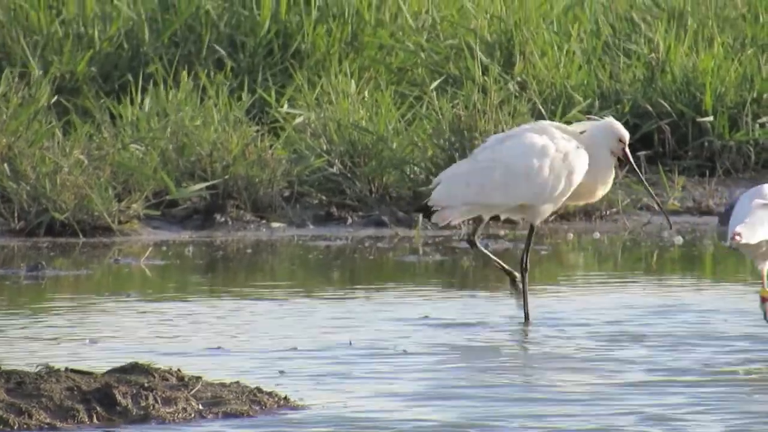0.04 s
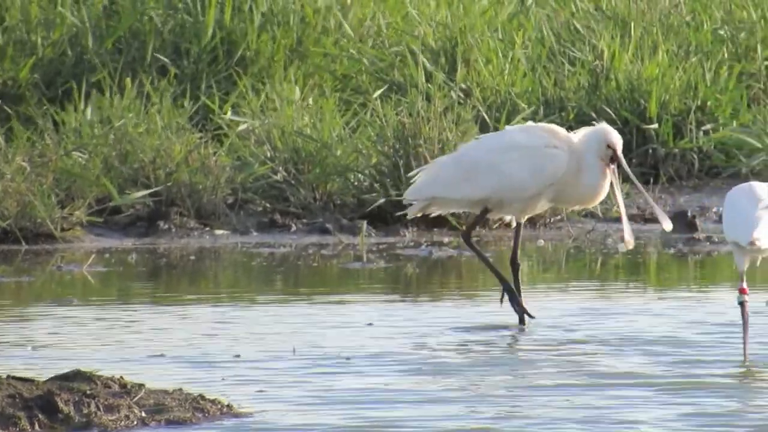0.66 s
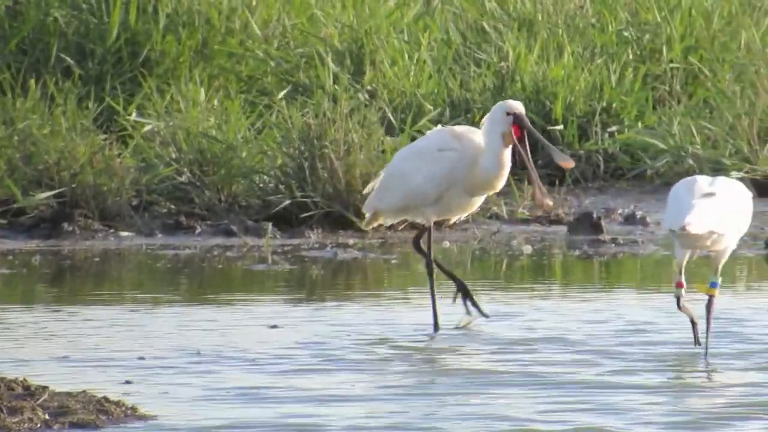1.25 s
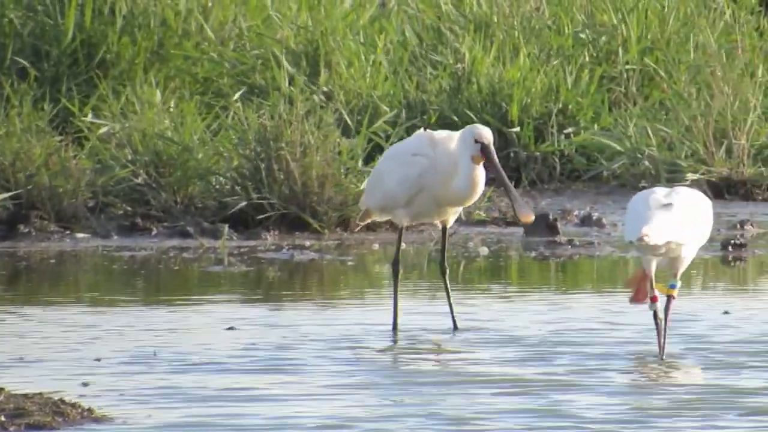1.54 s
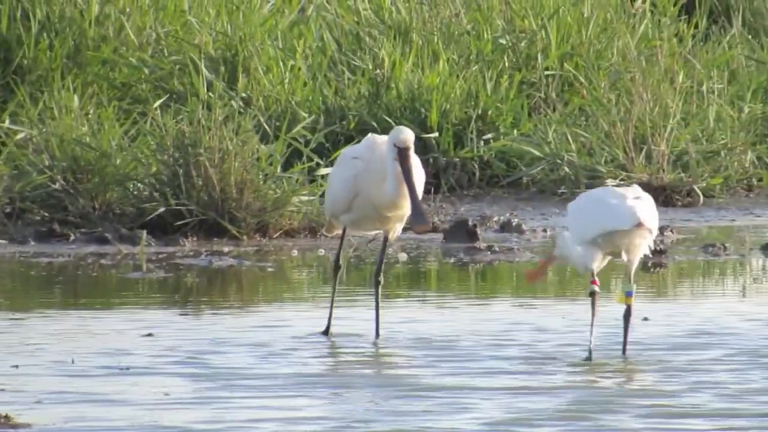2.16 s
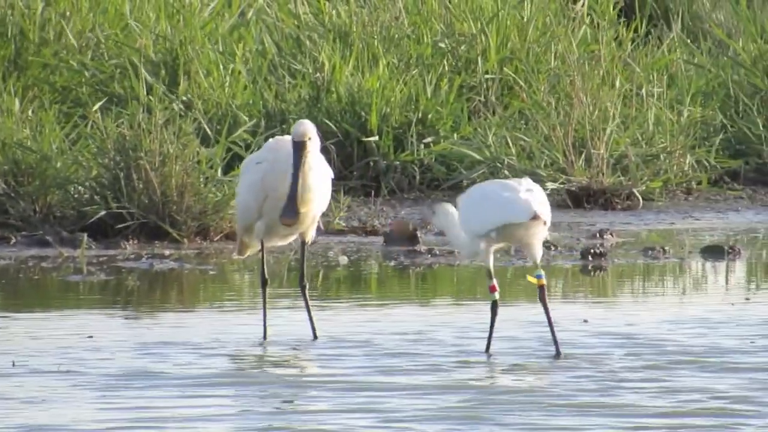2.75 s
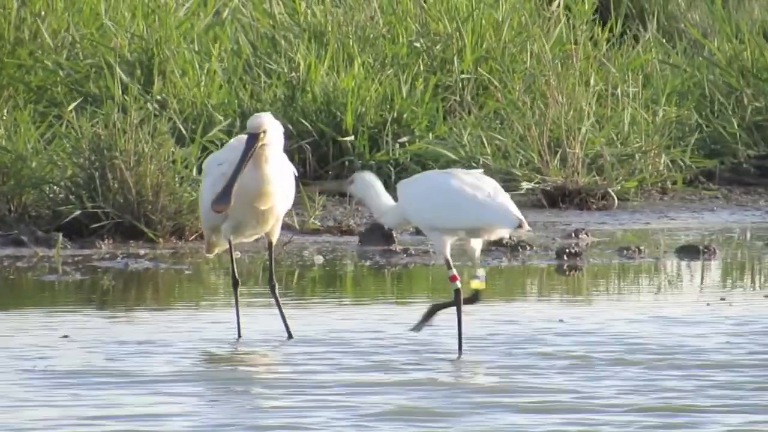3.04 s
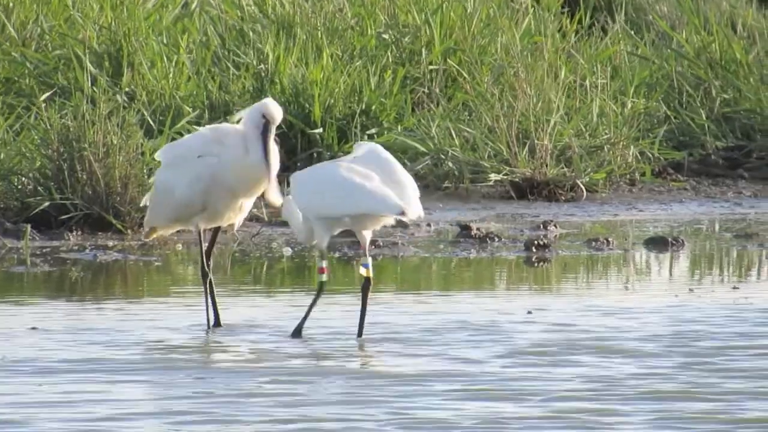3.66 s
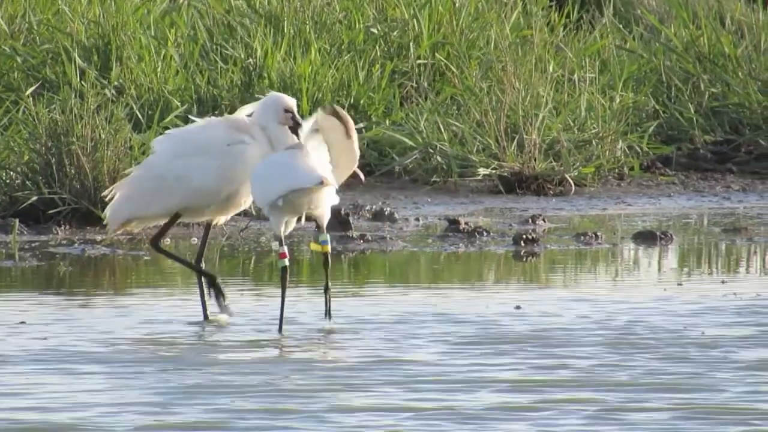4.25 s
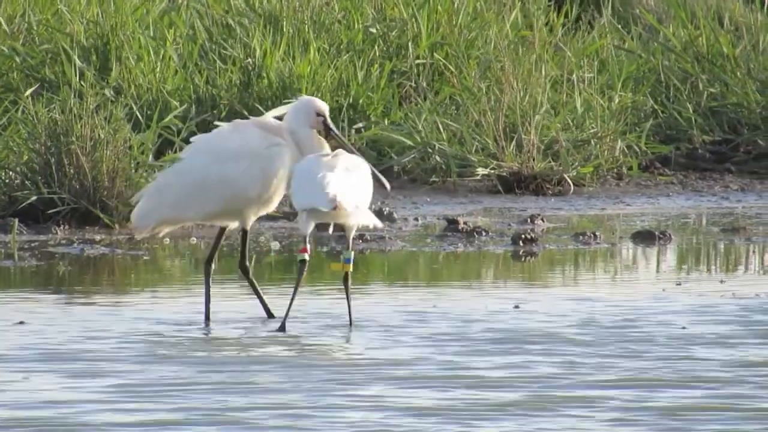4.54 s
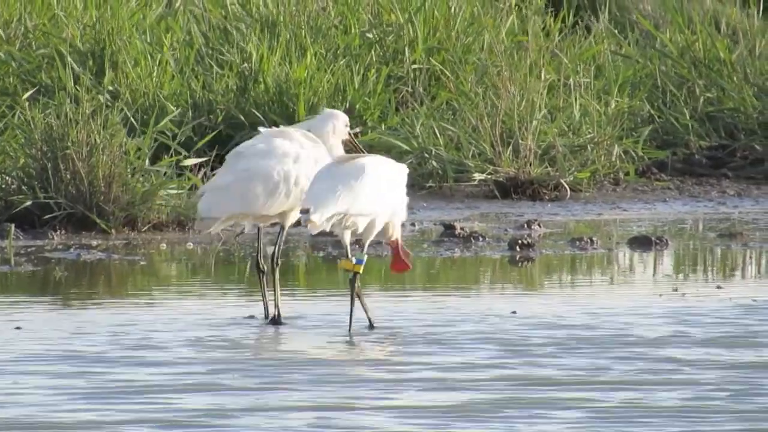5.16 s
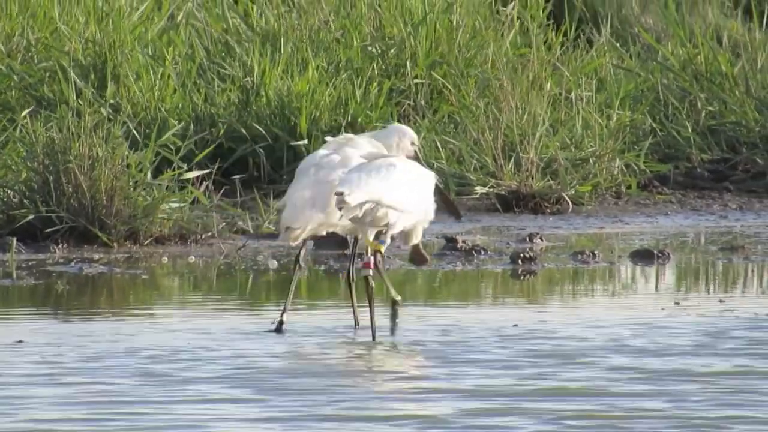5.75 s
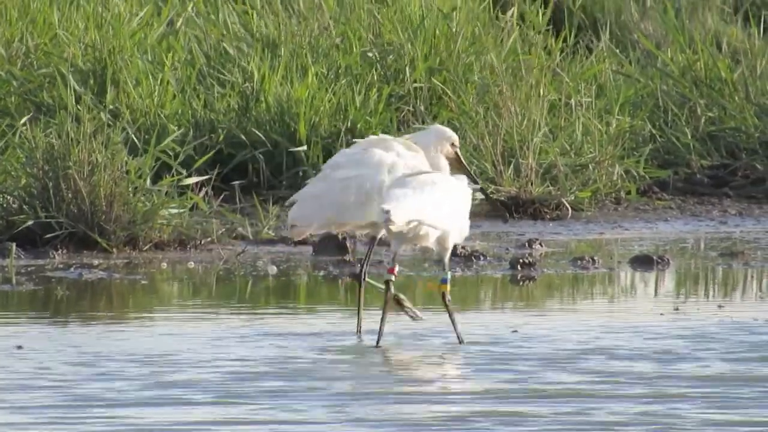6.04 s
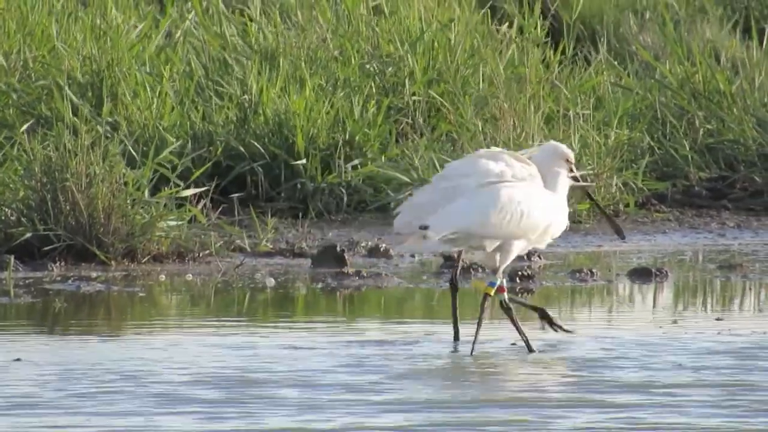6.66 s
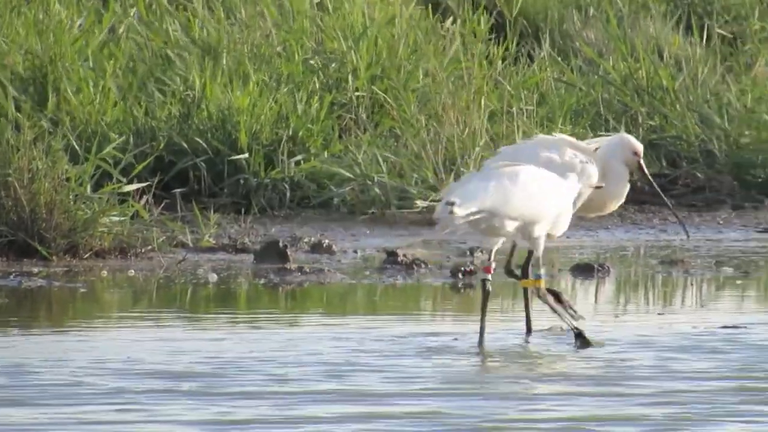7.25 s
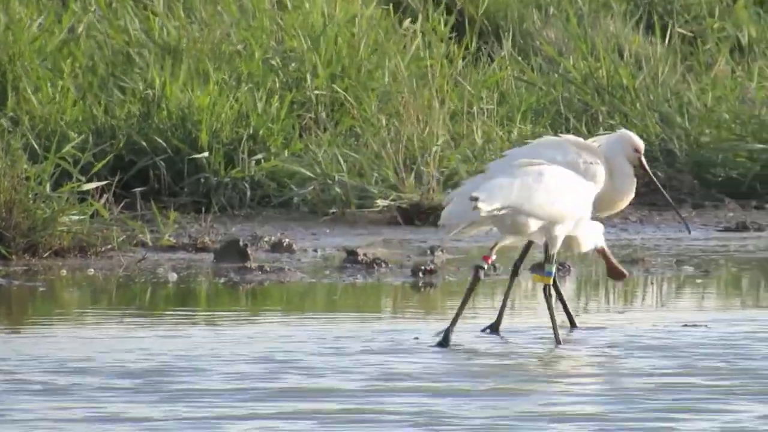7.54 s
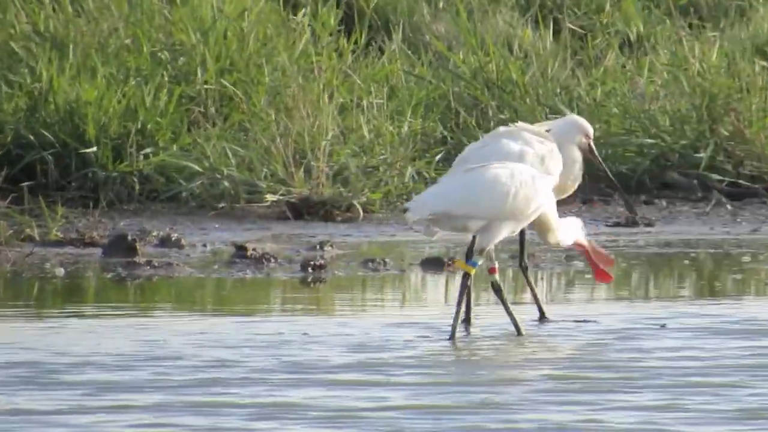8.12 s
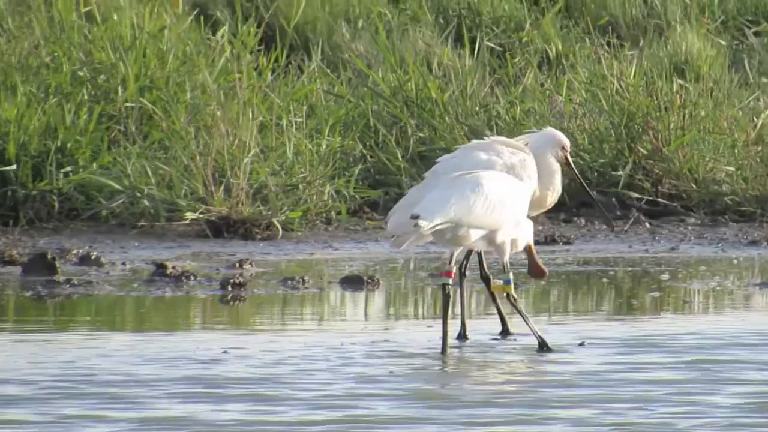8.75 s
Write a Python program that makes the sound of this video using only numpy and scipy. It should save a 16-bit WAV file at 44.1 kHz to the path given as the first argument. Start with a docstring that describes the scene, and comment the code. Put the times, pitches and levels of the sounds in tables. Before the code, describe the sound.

At a marsh pool, a songbird warbles, chatters and trills without pause above a distant rumble and soft wash of air.

```python
"""A distant rumble, the wash of open air and microphone hiss lie under the whole scene at a marsh pool.
At once a skylark starts to warble; its voice organ, the syrinx, slides, shakes or chops one pure whistle.
A low hum comes and goes from 2 s, while the lark chatters and rattles. Around 4 s it repeats high,
hissy pips and a buzz, and far-off water birds hoot faintly. Two cascades follow, then from about 7 s
three falling phrases with more far hoots. The song ends on quick flicks and a shivering trill."""
import sys
import numpy as np
from scipy import signal
from scipy.fft import rfft, irfft
from scipy.io import wavfile
from scipy.ndimage import map_coordinates

SR = 44100
rng = np.random.default_rng(int(sys.argv[2]) if len(sys.argv) > 2 else 0)


def materialize(psi):
    """Save the field psi as 16-bit PCM at rate SR to the path in sys.argv[1].

    A 1-D psi becomes a single channel; in a 2-D psi each row is a channel.
    """
    bounded = np.clip(np.atleast_2d(psi).T, -1, 1)
    quanta = np.round(bounded * 32767).astype(np.int16)
    wavfile.write(sys.argv[1], SR, quanta)


N = 387638
FREQS = np.maximum(np.arange(N // 2 + 1) * SR / N, 1)

# The tone colours of the three background noises. Each row: frequency in Hz, relative strength in dB.
RUMBLE_COLOUR = [(2.9, -32.5), (5.0, 6), (17, -3), (27, -7), (119, -18.5), (260, -29), (625, -46),
                 (902, -47.5), (1070, -47.5), (1180, -50), (1700, -61.5), (2400, -110)]
WASH_COLOUR = [(20, 2.5), (55, -14), (160, -25.5), (700, -27.5), (1500, -34.5), (2500, -55.5)]
HISS_COLOUR = [(900, -10.5), (1800, 1.5), (4500, -1.5), (15500, -3.5)]
# Calls of far-off birds. Each row: start and length in seconds, pitch at the start, middle and end
# in Hz, level in dB.
FAR_CALLS = [(.25, .35, 4780, 4830, 4980, -77), (3.877, .235, 1020, 1066, 1075, -60.5),
             (3.99, .11, 625, 682, 610, -62), (4.27, .1, 1020, 1060, 1120, -65),
             (7.55, .19, 1040, 1100, 1060, -65), (7.92, .2, 1055, 1092, 1010, -62)]
# The lark's song. A motif is a short phrase: all the slurs, pips and trills that bear its name.
# Each row: motif, start in seconds, level change in dB.
SONG = [("warble", -.099, 2), ("scoop", .229, 0), ("warble", .639, -.5), ("scoop", .962, -.5),
        ("warble", 1.371, 0), ("chatter", 1.706, 0), ("rattle", 2.414, 0), ("drone", 3.081, 0),
        ("drops", 3.494, -2), ("buzz", 3.624, 0), ("drops", 3.997, 1), ("buzz", 4.116, 1.5),
        ("drops", 4.489, 0), ("buzz", 4.620, -2), ("cascade", 4.999, 0), ("low whistle", 5.427, -1.5),
        ("twitter", 5.634, 0), ("cascade", 6.12, 0), ("low whistle", 6.569, 1), ("jumble", 6.784, 0),
        ("descent", 7.289, 0), ("descent", 7.589, 0), ("descent", 7.905, 1.6), ("flicks", 8.217, -.5),
        ("flicks", 8.387, 0), ("shiver", 8.561, 0)]
# Slurs are sliding notes. Each row: motif, course ("arc" or "snap"), start in the motif and length
# in seconds, pitch at the start, middle and end in Hz, base level in dB.
SLURS = [("scoop", "arc", .154, .16, 3400, 4070, 3680, -63),
         ("chatter", "arc", .028, .027, 2550, 2300, 2150, -62),
         ("chatter", "arc", .264, .026, 4700, 4560, 4280, -59),
         ("chatter", "arc", .293, .031, 3900, 3550, 3250, -58.5),
         ("rattle", "arc", .115, .011, 3400, 3050, 2300, -58),
         ("rattle", "arc", .133, .008, 2400, 2800, 3200, -61),
         ("cascade", "snap", .038, .038, 2900, 3950, 4050, -68),
         ("cascade", "snap", .174, .011, 5500, 3100, 2800, -66),
         ("low whistle", "snap", -.002, .03, 5500, 3950, 3750, -67),
         ("low whistle", "arc", .036, .008, 2560, 2780, 2650, -62.5),
         ("low whistle", "snap", .054, .076, 2550, 2330, 2270, -62),
         ("low whistle", "arc", .124, .028, 2320, 2170, 1980, -61),
         ("twitter", "arc", 0, .008, 5100, 3700, 2700, -62),
         ("twitter", "snap", .008, .014, 2700, 4700, 4900, -60.5),
         ("twitter", "arc", .025, .008, 5200, 4300, 2700, -62),
         ("twitter", "snap", .035, .027, 2700, 4750, 4100, -62.5),
         ("twitter", "arc", .059, .007, 4250, 3500, 2500, -62),
         ("twitter", "snap", .069, .031, 2300, 3550, 1800, -60.5),
         ("jumble", "arc", .102, .027, 6300, 5750, 3300, -63.5)]
# Runs of tiny notes. Each row: motif, start in the motif in seconds, number of pips, pips per second,
# pip length in seconds, first, middle and last pitch in Hz, base slide of a pip in Hz, base level in dB.
PIP_RUNS = [("scoop", .001, 11, 70.5, .012, 3460, 3130, 3360, 170, -61.3),
            ("chatter", 0, 2, 71, .01, 2200, 2300, 2400, -400, -63.5),
            ("chatter", .097, 6, 76, .009, 3600, 2830, 2520, 150, -57.5),
            ("chatter", .205, 3, 64, .009, 4620, 4620, 4680, 700, -52.5),
            ("chatter", .414, 10, 46.8, .009, 3900, 3980, 3950, 95, -62.5),
            ("chatter", .425, 9, 46.3, .009, 3020, 3020, 3000, 350, -63.5),
            ("rattle", .159, 5, 73, .011, 3300, 2680, 1900, -750, -59),
            ("rattle", .277, 37, 123.5, .0075, 2620, 2720, 2720, -1250, -61.8),
            ("drops", 0, 4, 36.5, .0098, 5780, 5060, 4350, -250, -54),
            ("buzz", .219, 5, 71, .0085, 5000, 4920, 4380, -200, -58.5),
            ("cascade", .001, 5, 122, .007, 3100, 2280, 2400, 200, -69),
            ("cascade", .076, 3, 55.5, .0175, 3620, 3450, 3300, 750, -62.5),
            ("jumble", 0, 3, 53, .01, 3300, 3500, 3750, -1100, -62),
            ("jumble", .056, 2, 52, .009, 4550, 4900, 5300, 200, -61),
            ("jumble", .164, 3, 38, .009, 4500, 4450, 4350, 500, -62),
            ("jumble", .174, 4, 38.5, .008, 3800, 3650, 2900, -1000, -60.5),
            ("jumble", .242, 7, 37.5, .008, 3000, 3080, 3100, 200, -69),
            ("jumble", .279, 6, 37.5, .008, 2560, 2520, 2520, -450, -63.5),
            ("descent", .144, 5, 53.5, .0185, 3700, 3290, 3130, -170, -59.5),
            ("flicks", 0, 4, 95, .009, 4200, 3400, 2450, 1300, -64.5),
            ("flicks", .054, 4, 48, .0085, 2950, 2650, 1950, 750, -58.3)]
# Trills are shaken notes. Each row: motif, course ("steady", "swells", "opens" or "settles"), start in
# the motif and length in seconds, pitch at the start, middle and end in Hz, base level at those three
# points in dB, shakes per second at first, pitch swing in Hz, dip in each shake in dB, and how far
# loudness runs ahead of pitch in radians.
TRILLS = [("warble", "swells", -.001, .252, 4700, 4400, 4400, -48, -52.5, -55.5, 49.6, 620, 8, .5),
          ("chatter", "settles", .356, .061, 3850, 3570, 3500, -59, -59.5, -60, 230, 400, 10, 1.2),
          ("rattle", "settles", .001, .082, 4450, 4170, 3920, -55.5, -58.5, -62, 117, 260, 10, 1.2),
          ("drone", "steady", -.001, .324, 4260, 4440, 4490, -53.5, -55.5, -51, 254, 100, 11, .26),
          ("buzz", "swells", .006, .227, 4190, 4740, 4970, -58, -55, -57.5, 262, 50, 8.5, .26),
          ("cascade", "opens", .198, .168, 4700, 3670, 2800, -62, -59.5, -54, 137, 400, 14, 1.1),
          ("twitter", "settles", .149, .245, 4600, 4300, 4000, -62, -65, -68, 69, 230, 10, 1.2),
          ("descent", "swells", 0, .152, 4850, 4630, 3830, -61, -60.5, -65, 55, -75, 16, -.1),
          ("shiver", "opens", 0, .255, 4330, 4170, 4350, -65, -58, -58.5, 75.1, 600, 7, .3)]
# How the microphone's two openings (ports) hear the lark. Each row: frequency in Hz, left minus right
# level in dB, how far the left runs ahead in radians.
PORT_DIFFERENCES = [(2260, 12, 0.22), (2730, 2, -0.23), (3390, 6.5, -0.99), (3600, -3, -0.95),
                    (3970, -12, .1), (4270, -6, 1), (5000, -3.5, 0.99)]


def undb(db):
    """Turn decibels into a number to multiply by."""
    return 10 ** (np.asarray(db) / 20)


def arc(u, start, middle, end):
    """A smooth curve through three values as u goes from 0 to 1."""
    return start + (end - start) * u + (2 * middle - start - end) * 2 * u * (1 - u)


def gate(t, length, attack, release):
    """A gentle fade in from time 0 and a fade out that ends at length."""
    return np.sin(np.pi / 2 * np.clip(np.minimum(t / attack, (length - t) / release), 0, 1)) ** 2


def wander(n, rate):
    """A smooth random curve, about 1 in size, that finds a new value rate times a second."""
    steps = np.arange(n) * rate / SR
    return map_coordinates(rng.standard_normal(int(steps[-1]) + 2), [steps], order=2, mode="nearest")


def add(track, start, sound):
    """Mix a sound into a track from a start time on."""
    at = int(start * SR) + np.arange(len(sound))
    inside = (at >= 0) & (at < len(track))
    track[at[inside]] += sound[inside]


def spread(table, column=1):
    """Spread one column of a table over all frequencies."""
    table = np.array(table, float)
    return np.interp(np.log(FREQS), np.log(table[:, 0]), table[:, column])


def noise(colour, db):
    """Noise of a given tone colour and level."""
    x = irfft(rfft(rng.standard_normal(N)) * undb(spread(colour)), N)
    return x * undb(db) / x.std()


def scatter(x, decay_s):
    """A blur of echoes from ground, reeds and banks, different at each port; it dies 60 dB in decay_s."""
    t = np.arange(SR) / SR
    tail = rng.standard_normal((2, SR)) * np.exp(-np.log(1000) * t / decay_s)
    tail /= np.sqrt(np.sum(tail[0] ** 2))
    return signal.fftconvolve(x[None], tail, axes=1)[:, :N]


def background(swell_db=.6):
    """The rumble reaches both ports alike, the wash of air differs between them, and each hisses alone."""
    rumble = noise(RUMBLE_COLOUR, db=-38.5) * undb(swell_db * wander(N, 2.89))
    wash = noise(WASH_COLOUR, db=-57.5) * np.array([[1], [-1]])
    hiss = np.array([noise(HISS_COLOUR, db=-68.5) for _ in range(2)])
    return rumble + wash + hiss


def hum(start_s=2.0, length=.8, hz=109, db=-51):
    """A low hum rises out of the rumble for a moment."""
    t = np.arange(N) / SR
    tone = np.sin(2 * np.pi * hz * t + wander(N, 10) / 2)
    return undb(db) * gate(t - start_s, length, length / 4, length / 2) * tone


def far_birds(direct_db=-1, echo_db=-6, waver=.007, fade_s=.04):
    """Soft hoots and pipings from across the marsh, blurred by distance."""
    calls = np.zeros(N)
    for start, length, *pitch_hz, db in FAR_CALLS:
        t = np.arange(int(length * SR)) / SR
        hz = arc(t / length, *pitch_hz) * (1 + waver * wander(len(t), 150))
        tone = np.sin(2 * np.pi * np.cumsum(hz) / SR)
        add(calls, start, undb(db) * gate(t, length, fade_s, fade_s) * tone)
    return undb(direct_db) * calls + undb(echo_db) * scatter(calls, decay_s=.3)


def whistle(hz, db, attack_s=.002, release_s=.004, best_hz=3700, edge_db=19, waver_hz=14, flutter_db=.6):
    """The lark's voice: one slightly unsteady pure tone, edge_db weaker an octave away from best_hz."""
    t = np.arange(len(hz)) / SR
    db = db - edge_db * np.log2(hz / best_hz) ** 4 + flutter_db * wander(len(t), 110)
    phase = 2 * np.pi * np.cumsum(hz + waver_hz * wander(len(t), 400)) / SR
    return np.sqrt(2) * undb(db) * gate(t, len(t) / SR, attack_s, release_s) * np.sin(phase)


def slur(course, length, start_hz, middle_hz, end_hz, db, snap_s=.004, swell_db=2.5):
    """A whistle that slides along one arc, or snaps to its middle pitch and drifts on from there."""
    t = np.arange(int(length * SR)) / SR
    u = t / length
    if course == "snap":
        hz = middle_hz + (end_hz - middle_hz) * u + (start_hz - middle_hz) * np.exp(-t / snap_s)
    else:
        hz = arc(u, start_hz, middle_hz, end_hz)
    return whistle(hz, db + arc(u, 0, swell_db, 0))


def pips(count, rate_hz, length, first_hz, middle_hz, last_hz, slide_hz, db,
         jitter_s=.0003, stray_hz=25, bow=.13, swell_db=1.8):
    """The syrinx snaps open at a nearly even pace, and the pips step along an arc of pitch."""
    slide = arc(np.linspace(0, 1, int(length * SR)), -slide_hz / 2, bow * slide_hz, slide_hz / 2)
    slide -= slide.mean()
    run = np.zeros(int((count / rate_hz + length) * SR))
    for k, (late, sharp) in enumerate(rng.standard_normal((int(count), 2))):
        u = k / (count - 1)
        centre_hz = arc(u, first_hz, middle_hz, last_hz) + stray_hz * sharp
        hz = centre_hz + slide * (centre_hz / middle_hz) ** 2  # low pips slide less
        pip = whistle(hz, db + arc(u, 0, swell_db, 0))
        add(run, max(k / rate_hz + jitter_s * late, 0), pip)
    return run


def shake_depth(course, t, u, widen_s=.03, open_share=.42, settle_share=.65):
    """A shake opens out of a plain whistle, settles into one, or is there almost at once."""
    if course == "opens":
        return np.minimum(u / open_share, 1) ** 1.5
    if course == "settles":
        return 1 - np.minimum(u / settle_share, 1) ** 3
    return 1 - .5 * np.exp(-t / widen_s)


def trill(course, length, start_hz, middle_hz, end_hz, start_db, middle_db, end_db,
          rate_hz, swing_hz, dip_db, lead, flat_top=.22, wobble=.003, soft_db=9, swell_s=.02):
    """Tension in the syrinx swings to and fro, shaking both pitch and loudness."""
    t = np.arange(int(length * SR)) / SR
    u = t / length
    slowing = .0017  # each shake is this share longer than the one before
    turn = 2 * np.pi * np.log1p(slowing * rate_hz * t) / slowing
    depth = shake_depth(course, t, u)
    swing = np.sin(turn) + flat_top * (1 - u) * np.cos(2 * turn)  # blunt tops that grow more pointed
    hz = arc(u, start_hz, middle_hz, end_hz) + depth * swing_hz * swing
    hz *= 1 + wobble * wander(len(t), 35)
    effort_db = arc(u, start_db, middle_db, end_db)
    if course == "swells":
        effort_db -= soft_db * np.exp(-t / swell_s)
    shake_db = depth * dip_db * (np.sin(turn + lead) - 1) / 2
    return whistle(hz, effort_db + shake_db, attack_s=.003, release_s=.11 * length)


def fray(sound, band_hz=(5000, 7800), db=-13):
    """High pips forced so hard that they fray into hiss, most of all at their loudest moments."""
    band = signal.butter(2, band_hz, "band", fs=SR, output="sos")
    hiss = signal.sosfilt(band, rng.standard_normal(len(sound)))
    strain = sound ** 2 / np.abs(sound).max()
    return undb(db) * strain * hiss / hiss.std()


def notes(motif):
    """Sing a motif afresh, giving each part's start in the motif and its sound."""
    return ([(at, slur(course, *shape)) for name, course, at, *shape in SLURS if name == motif]
            + [(at, pips(*shape)) for name, at, *shape in PIP_RUNS if name == motif]
            + [(at, trill(course, *shape)) for name, course, at, *shape in TRILLS if name == motif])


def at_ports(song):
    """The body around the microphone shades and delays the song differently at each port."""
    left = undb(spread(PORT_DIFFERENCES) / 2) * np.exp(.5j * spread(PORT_DIFFERENCES, column=2))
    ports = np.array([left, 1 / left])
    ports /= np.abs(ports.mean(axis=0))
    return irfft(rfft(song) * ports, N)


def skylark(ground_db=-13.5, reeds_db=-23):
    """The song comes from the open sky, with a quick echo off the ground and a longer one off the reeds."""
    song = np.zeros(N)
    for motif, start, db in SONG:
        for offset, sound in notes(motif):
            if motif == "drops":
                sound = sound + fray(sound)
            add(song, start + offset, undb(db) * sound)
    echoes = undb(ground_db) * scatter(song, decay_s=.035) + undb(reeds_db) * scatter(song, decay_s=.2)
    return at_ports(song) + echoes


def scene():
    """Everything at the marsh pool, mixed in stereo."""
    return background() + hum() + far_birds() + skylark()


def record(dry, fade_s=.004, top_hz=15650):
    """Soften the start and the end, and cut off the highest treble."""
    faded = dry * gate(np.arange(N) / SR, N / SR, fade_s, fade_s)
    return signal.sosfilt(signal.ellip(10, .1, 70, top_hz, fs=SR, output="sos"), faded)


dry = scene()
out = record(dry)
materialize(out)
```